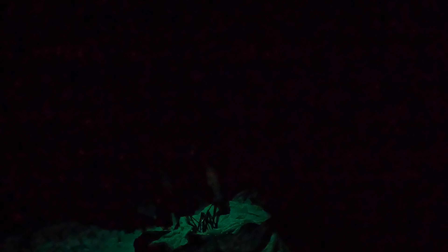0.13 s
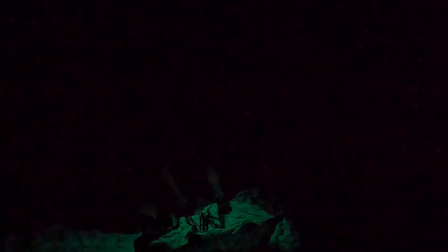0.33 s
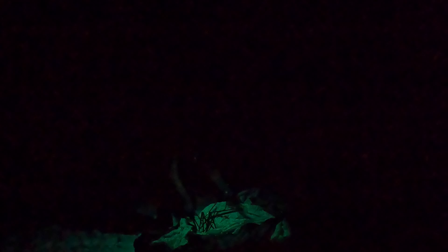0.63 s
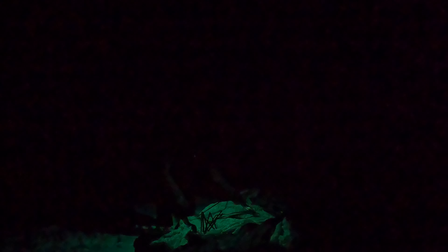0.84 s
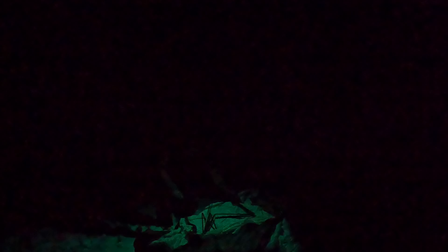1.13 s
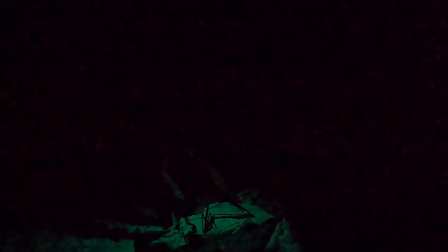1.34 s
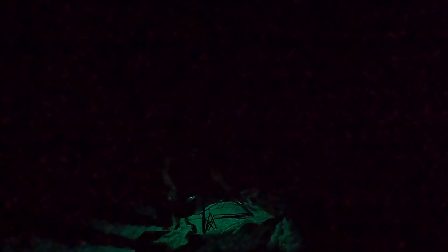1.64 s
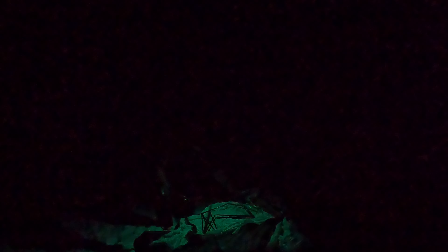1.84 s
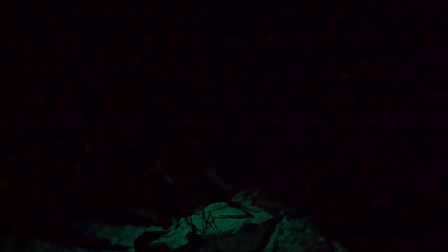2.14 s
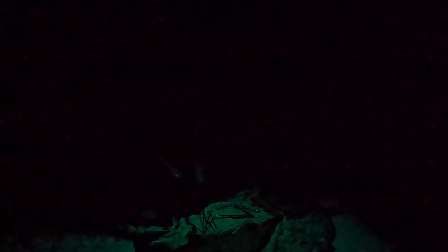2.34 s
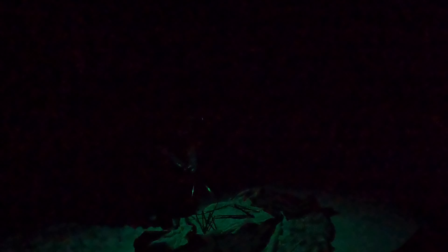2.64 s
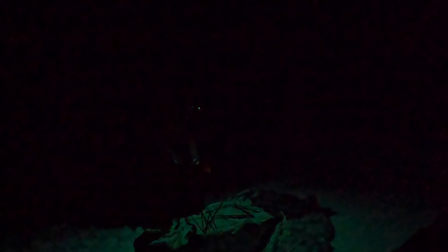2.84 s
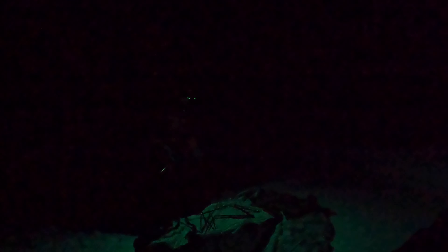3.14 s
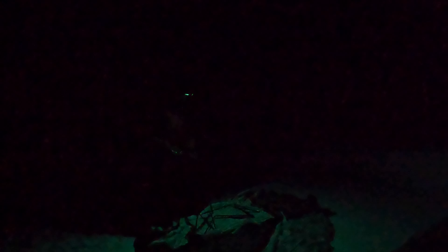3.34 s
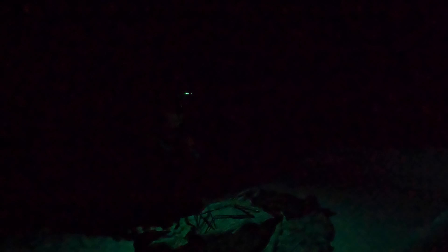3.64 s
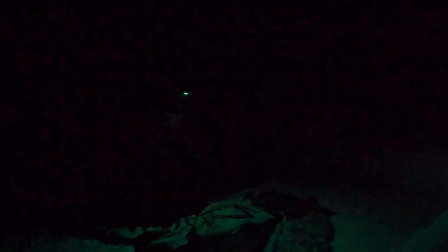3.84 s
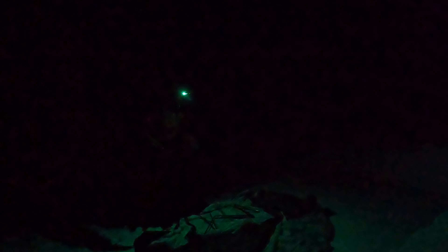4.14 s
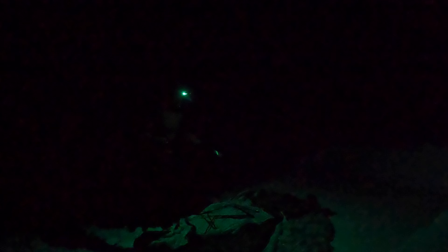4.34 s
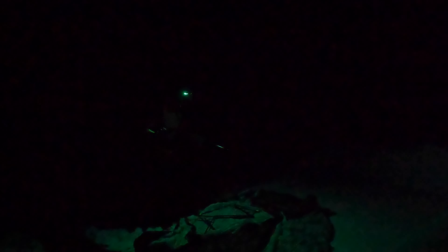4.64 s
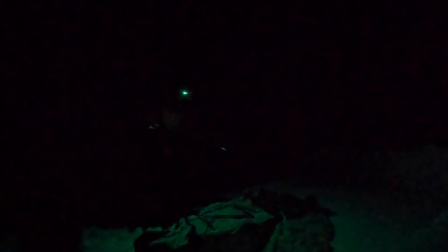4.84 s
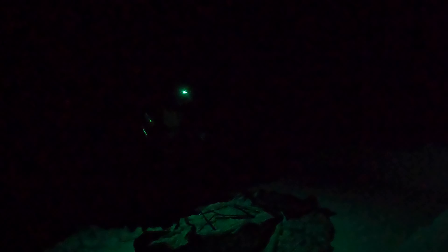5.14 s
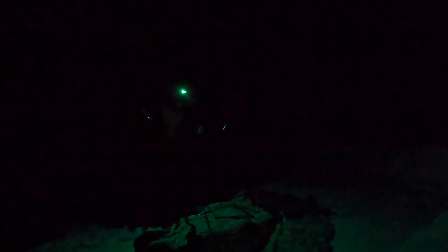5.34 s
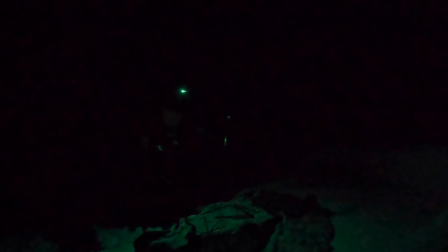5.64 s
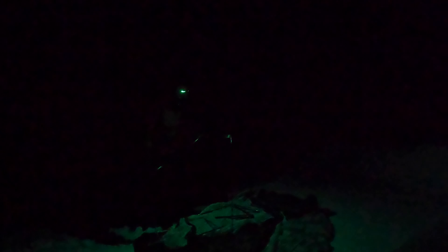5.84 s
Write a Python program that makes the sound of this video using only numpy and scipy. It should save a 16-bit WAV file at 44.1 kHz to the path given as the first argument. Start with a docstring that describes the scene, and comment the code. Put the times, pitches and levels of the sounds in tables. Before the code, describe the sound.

Stiff nylon crackles, rustles and snaps as a tent is unpacked in the dark, poles knocking lightly, wind rumbling on the microphone.

```python
"""Unpacking a tent in the cold wind

Stiff nylon slides, crackles and snaps: coloured friction noise, tiny clicks and ragged noise bursts.
Aluminium pole sections knock as bursts too, and now and then ring freely as decaying bending modes.
Wind buffets the two microphone ports and lays a lumpy rumble of drifting noise and dull pops underneath."""
import sys
import numpy as np
from scipy import signal
from scipy.fft import rfft, irfft
from scipy.io import wavfile
from scipy.ndimage import uniform_filter1d

SR = 44100
rng = np.random.default_rng(int(sys.argv[2]) if len(sys.argv) > 2 else 0)


def output_pcm(signal):
    """Save a mono or channel-first signal as 16-bit PCM at the path in sys.argv[1].

    Samples are clipped to [-1, 1] before scaling.
    """
    pcm = np.clip(np.atleast_2d(signal).T, -1, 1) * 32767
    wavfile.write(sys.argv[1], SR, np.round(pcm).astype(np.int16))


def volts(x):
    """Linear amplitude factor 10**(x/20) for a level x in dB, scalar or array-like."""
    e = np.asarray(x, float) / 20
    return 10 ** e


N = 263673


def rms_one(x):
    """Scale to rms 1."""
    return x / np.sqrt(np.mean(x ** 2) + 1e-20)


def in_time(rows):
    """Columns of a curve table after its times, one value per sample."""
    s, *columns = np.transpose(rows)
    return [np.interp(np.arange(N) / SR, s, column) for column in columns]


def sides(pan_db):
    """Left and right gains for a level difference, positive to the left."""
    return volts(np.array([pan_db / 2, -pan_db / 2]))


def band(x, low_hz, high_hz):
    """Butterworth band-pass."""
    edges_hz = [low_hz, min(high_hz, .45 * SR)]
    return signal.sosfilt(signal.butter(2, edges_hz, "band", fs=SR, output="sos"), x)


def colour(x, spectrum):
    """Give a steady noise its spectrum and rms 1."""
    hz = np.maximum(np.arange(N // 2 + 1) * SR / N, 1)
    point_hz, point_db = np.transpose(spectrum)
    gain_db = np.interp(np.log(hz), np.log(point_hz), point_db, left=-80, right=-80)
    return rms_one(irfft(rfft(x) * volts(gain_db), N))


def drift(corner_hz):
    """Slow chance with spread 1: noise through two equal one-pole low-passes."""
    step = 40   # samples between computed points
    r = np.exp(-2 * np.pi * corner_hz * step / SR)
    white = rng.standard_normal(N // step + 2002)
    slow = signal.lfilter([1], [1, -2 * r, r * r], white)[2000:]    # skip the filter's start
    return np.interp(np.arange(N) / step, np.arange(len(slow)), rms_one(slow))


def pair(alike):
    """Two noises that share a part: 0 unrelated, 1 identical."""
    mid, side = rng.standard_normal((2, N))
    alike = np.clip(alike, 0, 1)
    return np.sqrt(1 + alike) * mid + np.sqrt(1 - alike) * side * [[1], [-1]]


def ring(x, hz, t60_s):
    """Two-pole resonator: a unit click sets a sine of about height 1 ringing."""
    r = volts(-60 / (t60_s * SR))
    w = 2 * np.pi * hz / SR
    return signal.lfilter([0, np.sin(w)], [1, -2 * r * np.cos(w), r * r], x + 1e-18)


def late_left(x, lag_ms=0.5):
    """Eddies drift past the right port first, so the left channel is delayed."""
    n = np.arange(N)
    return np.array([np.interp(n - lag_ms * SR / 1000, n, x[0]), x[1]])


# wind on the ports before buffets and chance swings: start_s, rumble_db, sharpness_db (upper over rumble)
WIND = [(0, -28, -30.5), (.3, -23.5, -15), (.75, -30.5, -19.5), (1.2, -29.5, -20), (1.42, -35, -32.5),
        (1.6, -30, -28.5), (2.1, -27, -21.5), (2.4, -31.5, -20), (2.72, -27.5, -22.5), (2.85, -36, -22),
        (3.12, -41.5, -19), (3.27, -38, -17.5), (3.4, -23, -21), (3.9, -25, -22.5), (4.3, -24, -11),
        (4.75, -26.5, -16.5), (5.05, -24.5, -14.5), (5.45, -25.5, -16.5), (5.65, -18.5, -17.5),
        (5.8, -28.5, -25.5), (5.98, -24, -11)]
# colour of the deep rumble: pitch_hz, density_db (dB per Hz)
WIND_LOW = [(15, 10.5), (30, 1), (60, 0), (100, -6), (150, -17.5), (220, -33.5)]
# colour of the upper rumble: pitch_hz, density_db (dB per Hz)
WIND_HIGH = [(80, -9.5), (150, 4), (220, -2), (320, -15), (500, -29), (800, -38.5)]
# buffets that swell or sink: middle_s, upper_lift_db, length_s (between the 1/e points of the dB curve)
BUFFETS = [(0.172, 16, 0.084), (.37, 7, .05), (.485, 11, 0.054), (0.772, 10, 0.16), (1.147, 13, 0.023),
           (1.727, 12.5, 0.023), (2.009, 11, 0.078), (2.191, 8.5, 0.063), (2.35, 15, 0.028),
           (2.463, 17.5, 0.05), (2.64, 5, 0.087), (3.323, 19.5, 0.13), (3.509, 10, .08), (3.69, 16.5, 0.04),
           (3.853, 18.5, 0.096), (4.127, 12, 0.062), (4.49, -10, 0.031), (4.581, 11.5, .05),
           (4.915, 11, 0.07), (4.976, 11, 0.067), (5.118, 12, 0.072), (5.357, 12, 0.05), (5.545, 16, 0.077),
           (5.681, 10, .07), (5.877, 3.5, 0.047)]


def wind():
    """Eddies push on the ports; the small sharp ones come in lumps and hit the right port harder."""
    rumble_db, sharp_db = in_time(WIND)
    t = np.arange(N) / SR
    lift_db = sum(db * np.exp(-(2 * (t - s) / length) ** 2) for s, db, length in BUFFETS)
    gust_db = 1.5 * drift(8.0)
    veer_db = 1.8 + 2.5 * drift(8.0)    # both rumbles wander about a lean to the left
    low = colour(pair(0.55) * volts(1.67 * drift(25)), WIND_LOW)
    low = low * volts(0.49 * lift_db)     # the deep rumble takes about half of each buffet
    lumps = volts(2.2 * drift(30) + [1.5 * drift(30), 1.5 * drift(30)])   # shared, then per port
    high = late_left(colour(pair(0.74) * lumps, WIND_HIGH))
    high = high * sides(pan_db=-7.0)[:, None]
    high = high * volts(sharp_db + lift_db + 1.5 * drift(9.5))
    rumble = volts(rumble_db + gust_db) * sides(veer_db) * (low + high)
    return rumble + late_left(pops())


def grains(per_s, spread_db, low_hz, high_hz, count=8):
    """Creases let go in clumps of tiny unequal clicks, each dying within a cycle of one of a few pitches."""
    sizes = volts(spread_db * np.minimum(rng.exponential(1, N), 4)) * rng.choice([-1, 1], N)
    chance = per_s * volts(5.0 * drift(25)) / SR      # clumping swings the rate
    clicks = sizes * (rng.random(N) < chance)
    dealt = rng.integers(0, count, N)
    out = np.zeros(N)
    for k, hz in enumerate(np.geomspace(low_hz, high_hz, count)):
        out += rms_one(ring(clicks * (dealt == k), hz, 0.64 / hz)) * np.sqrt(hz)
    return rms_one(out)


# sliding cloth, rms levels ahead of the ports: start_s, swish_db (dull), rasp_db (middle), hiss_db (bright)
SLIDE = [(0, -56, -49.5, -55.5), (.2, -57, -60, -54.5), (.42, -50, -55, -56), (.52, -46.5, -51, -53.5),
         (.62, -59, -60, -63.5), (.75, -58, -47, -51), (.9, -60, -61, -65), (1.03, -63, -52, -52.5),
         (1.15, -71, -72, -70), (1.4, -72, -73.5, -77), (1.85, -72, -74, -72), (1.93, -56, -51.5, -57),
         (2.05, -51, -50, -59), (2.18, -65.5, -69, -72), (2.43, -62.5, -65.5, -63),
         (2.7, -52.5, -55, -54.5), (2.93, -55, -59, -54), (3.1, -62, -63.5, -62), (3.45, -63, -57, -61.5),
         (3.62, -59.5, -58.5, -53), (3.72, -57, -55, -55), (3.87, -64, -52.5, -55.5),
         (4.19, -64.5, -56.5, -56.5), (4.4, -74.5, -72.5, -69.5), (4.55, -56.5, -47, -50),
         (4.62, -61, -51, -53), (4.8, -67, -64.5, -64), (5.05, -73, -71, -67), (5.22, -66, -59, -55.5),
         (5.45, -59.5, -57.5, -61), (5.56, -57.5, -58, -62), (5.75, -71.5, -64, -62.5),
         (5.98, -48, -41.5, -48.5)]
# how far the cloth crumples rather than glides: start_s, crumple (0-1)
CRUMPLE = [(0, .8), (.6, 1), (1.1, .9), (2.1, .9), (2.55, .9), (2.65, .25), (3.5, .3), (3.7, .6),
           (3.85, .15), (4.35, .15), (4.5, .9), (5.98, .9)]
# colour of the dull part: pitch_hz, density_db (dB per Hz)
SWISH = [(350, -4), (650, -6), (900, -10), (1150, 2), (1500, 0), (1900, -5), (2600, -35)]
# colour of the middle part: pitch_hz, density_db (dB per Hz)
RASP = [(1300, -9.5), (2000, -3.5), (2800, 3), (3500, -0.5), (4500, -3.5)]
# colour of the bright part: pitch_hz, density_db (dB per Hz)
HISS = [(2000, -40), (3500, 4), (5000, 8), (7500, 5.5), (9000, 0.5), (12000, -3.5), (14500, -9)]


def cloth():
    """Smooth friction noise with crackle in it, in a dull, a middle and a bright part."""
    swish_db, rasp_db, hiss_db = in_time(SLIDE)
    crumple, = in_time(CRUMPLE)
    flutter = volts(2.8 * crumple * drift(21))
    coarse = crumple * grains(500.0, 4.0, low_hz=600, high_hz=4000)
    fine = crumple * grains(800.0, 3.2, low_hz=2500, high_hz=12000)
    swish = colour(pair(1.0) * flutter + volts(-6) * coarse, SWISH)
    rasp = colour(pair(1.0) * flutter + volts(0.5) * coarse, RASP)
    hiss = colour(pair(1.0) * flutter + volts(-5.0) * fine, HISS)
    return volts(swish_db) * swish + volts(rasp_db) * rasp + volts(hiss_db) * hiss


def ticks(count=120):
    """Small dull ticks by chance, as rows like SNAPS: crowded in strong crumpling swish, louder with it."""
    swish_db = in_time(SLIDE)[0]
    when, size, pitch, length = rng.random((count, 4)).T
    share = np.cumsum(in_time(CRUMPLE)[0] ** 2 * volts(0.65 * swish_db))
    at = np.minimum(np.searchsorted(share / share[-1], when), N - 1)
    peak_db = swish_db[at] + 10 - 4 * np.log(np.maximum(size, .05))
    patch_hz = 1080 * 2 ** (2.0 * pitch ** 2)       # up to two octaves above 1080 Hz
    top_db = np.full(count, -16.5)
    t60_ms = 12 * 6.6 ** (2 * length - 1)
    return np.transpose([at / SR, peak_db, patch_hz, top_db, t60_ms])


# snaps of cloth and knocks of held poles, ahead of echoes and ports:
# start_s, peak_db (nominal), patch_hz (resounding patch), top_db (over the middle part), t60_ms (nominal)
SNAPS = [(.0215, -32.5, 3180, -17, 30), (.0456, -36, 4900, -24, 23), (.0536, -35.5, 4500, -10, 17),
         (.1664, -36.5, 2220, -12, 28), (.1883, -38, 1380, -10, 34), (.2078, -26.5, 4900, -10, 31),
         (.2723, -35.5, 4380, -6, 110), (.2846, -33.5, 3320, -19, 37), (.2927, -30.5, 4140, -12, 98),
         (.307, -31, 4300, -3.5, 28), (.3604, -40, 3070, -27, 5.9), (.3787, -53, 1360, -9, 9),
         (.42, -43, 1140, -14, 15), (.4345, -48, 1190, -20, 19), (.4759, -42, 1180, -17, 18),
         (.483, -38, 1410, -18, 6.4), (.5141, -42, 1210, -18, 7.7), (.5515, -28.5, 1380, -28, 8.7),
         (.597, -46, 1420, -15, 11), (.662, -42, 3540, -25, 27), (.6782, -29, 4780, -19, 13),
         (.7138, -18, 5170, -10, 35), (.7688, -29, 3900, -14, 16), (.782, -26.5, 3540, -6, 59),
         (.8254, -37.5, 1300, -13, 43), (.8871, -34, 5070, -9, 32), (.9576, -30.5, 3600, -14, 62),
         (.9256, -41, 3470, -21, 34), (.9798, -38, 2760, -26, 110), (1.0303, -52, 2950, -16, 63),
         (1.0976, -25, 3700, -2.5, 31), (1.107, -38, 3700, -12, 71), (1.1938, -41.5, 5100, -1, 40),
         (1.2108, -27.5, 3730, -7, 49), (1.221, -27, 5300, -16, 47), (1.2322, -18.5, 4540, -9, 25),
         (1.2446, -32.5, 4970, -11, 118), (1.2989, -24.5, 3500, -11, 23), (1.3067, -33.5, 5070, -12, 75),
         (1.407, -39.5, 2440, -31, 10), (1.4783, -48, 1500, -9, 11), (1.5903, -37.5, 1070, -9, 1.4),
         (1.608, -51, 1220, -11, 10), (1.6308, -39.5, 1300, -11, 4), (1.67, -46.5, 6650, -11, 12),
         (1.7043, -47, 1230, -6, 6.2), (1.7375, -37, 5300, -6, 16), (1.8086, -41, 2820, -14, 41),
         (1.8771, -31, 1340, -11, 8.9), (1.8962, -33, 1910, -10, 25), (1.907, -27.5, 4750, -1, 112),
         (1.9287, -37, 2780, -17, 53), (1.945, -25, 3540, -21, 13), (1.984, -41, 1270, -9.5, 22),
         (2.0194, -43.5, 4240, -2, 22), (2.0428, -42, 1210, -10, 43), (2.1085, -33, 1330, -15, 11),
         (2.122, -30.5, 4180, -9, 23.5), (2.171, -38.5, 1180, -10, 6.9), (2.1927, -41.5, 1960, -26, 12),
         (2.223, -38.5, 1780, -26, 9.2), (2.3371, -40, 1360, 1, 26), (2.3513, -40, 1940, -16, 5.6),
         (2.4003, -38, 990, -22, 8.2), (2.4376, -44, 5600, -2, 30), (2.5204, -33.5, 1720, -12, 7.5),
         (2.5762, -44, 1110, -16, 19), (2.5943, -45, 1700, -8, 22), (2.85, -36.5, 2740, -16, 20),
         (2.9381, -36, 2830, -11, 18), (2.9817, -25, 6600, -6.5, 33), (2.9914, -31.5, 6540, -13, 75),
         (3.0568, -15.5, 10700, -3.5, 28), (3.0813, -30.5, 6600, -4, 56), (3.261, -37.5, 2720, -11, 40),
         (3.2871, -30.5, 1300, -22, 2.8), (3.2955, -25, 4460, -4.5, 67), (3.3356, -40.5, 1690, -17, 25),
         (3.5302, -39.5, 1900, -7, 10), (3.6507, -37, 6010, -10, 30), (3.6906, -39, 1810, -5.5, 21),
         (3.7799, -20, 5800, 2, 38), (3.8132, -26, 5650, -6, 57), (3.8393, -41, 4350, -11, 61),
         (4.125, -24, 2770, -8, 66), (4.3641, -22.5, 5800, -5, 12), (4.3747, -35.5, 5730, -14, 124),
         (4.4201, -23, 7030, -7, 22.4), (4.4291, -30.5, 4750, -8.5, 70), (4.468, -34.5, 1260, -16, 26),
         (4.488, -34.5, 1310, 0, 47), (4.528, -23, 4260, -9, 13), (4.5417, -15, 5320, 2, 35),
         (4.5594, -24.5, 4140, -16, 33), (4.6157, -34.5, 2240, -10, 26), (4.6477, -38.5, 4290, -16, 20),
         (4.6738, -37, 4220, -14, 97), (4.6936, -20, 6470, -4, 46), (4.7167, -50, 3230, 0, 15),
         (4.7413, -16, 3550, -11.5, 24.7), (4.8551, -33, 5330, -7, 16), (4.898, -28, 6340, -10, 25),
         (4.9073, -35, 3640, -15, 180), (4.9447, -24.5, 3210, -14.5, 29), (4.965, -38, 3600, -21, 20),
         (5.0141, -36, 3470, -17, 36), (5.0834, -38.5, 3800, -7.5, 78), (5.1738, -30.5, 6040, -6.5, 27),
         (5.21, -28, 6400, -5, 23), (5.2351, -23.5, 5150, -9, 29), (5.2756, -18.5, 11900, -10, 22),
         (5.2916, -37, 5840, -4, 82), (5.3278, -18.5, 7080, 1, 18), (5.3394, -36, 9350, -2, 24),
         (5.37, -34.5, 6220, -14, 15), (5.4018, -38, 3920, -11, 31), (5.42, -31, 1140, -22, 4.1),
         (5.4415, -36.5, 3790, -2, 140), (5.4808, -17, 4700, -2.5, 27), (5.5227, -13, 2560, -9, 12),
         (5.5421, 0, 9650, 3, 13.6), (5.5676, -25.5, 4110, -21, 17), (5.5858, -28, 3800, -18, 22),
         (5.622, -27.5, 3360, -8, 85), (5.6481, -3, 7430, 5.5, 11), (5.6607, -25.5, 3360, -21.5, 52),
         (5.6742, -16.5, 5700, -2, 28), (5.6827, -21, 3440, -9.5, 65), (5.7091, -16, 5340, -5.5, 33),
         (5.8442, -33, 5000, -12, 160), (5.875, -23, 1000, 0, 6.8), (5.8776, -24, 720, -10.5, 200),
         (5.9248, -23, 2550, -8, 18), (5.9547, -19, 4770, -12, 23), (5.9733, -22.5, 4020, -9, 57)]
# edges of the four parts of a snap, bottom to top: low_hz, high_hz
SNAP_BANDS_HZ = [(500, 1640), (1200, 2610), (2500, 7160), (7500, 11860)]
# low part of a snap by its patch, ahead of the loss in short stiff snaps: patch_hz, low_db (over the middle)
SNAP_LOW = [(750, 4), (1100, 12.5), (2000, 0), (3200, -9), (9000, -6)]


def snaps(size=2560):
    """A ragged burst of cracks that swells and dies; the shaken patch resounds, a faint rattle trails."""
    s, peak_db, patch_hz, top_db, t60_ms = np.vstack([SNAPS, ticks()]).T[:, :, None]
    table_hz, table_db = np.transpose(SNAP_LOW)
    low_db = np.interp(np.log(patch_hz), np.log(table_hz), table_db)
    # above 3 kHz short snaps lose 17.5 dB more per halving under 30 ms
    low_db = low_db + 17.5 * (patch_hz > 3000) * np.minimum(np.log2(t60_ms / 30), 0)

    t_ms = np.arange(size) / SR * 1000
    white, ragged = rng.standard_normal((len(s), 2, size)).transpose(1, 0, 2)
    rise_ms = 0.34 + 0.031 * t60_ms     # long snaps also swell more slowly
    swell = np.minimum(t_ms / rise_ms, 1) ** 1.3
    dying_ms = np.maximum(t_ms - rise_ms, 0)
    decay = volts(-60 * (dying_ms / t60_ms) ** 0.98)
    rattle = volts(-22.5 - 60 * (dying_ms / 70) ** 1.2)   # the faint, longer tail
    push = white * np.abs(ragged) ** 1.49 * swell * (decay + rattle)

    parts = np.array([band(band(push, *edges_hz), *edges_hz) for edges_hz in SNAP_BANDS_HZ])
    bottom, low, middle, top = parts / parts.std(axis=2, keepdims=True)
    depth_db = 0.94 * np.minimum(low_db, 8) - 13    # the duller the snap, the further down it reaches
    broad = volts(low_db) * (low + volts(depth_db) * bottom) + middle + volts(top_db) * top

    patch_t60_s = .009
    overtones = 1.304 + 0.79 * rng.random((len(s), 2))      # two per patch, as pitch ratios
    patch = []
    for x, hz, ratios in zip(push, patch_hz[:, 0], overtones):
        upper = sum(0.08 * ring(x, min(hz * ratio, 13000), patch_t60_s) for ratio in ratios)
        patch.append(rms_one(ring(x, hz, patch_t60_s) + upper))
    snap = broad + volts(-4.0) * broad.std(axis=1, keepdims=True) * patch

    # height of a sine as strong as the loudest 1.5 ms
    height = np.sqrt(2 * uniform_filter1d(snap ** 2, size=66).max(axis=1, keepdims=True))
    out = np.zeros(N + size)
    for at, one in zip(np.round(s[:, 0] * SR).astype(int), volts(peak_db) * snap / height):
        out[at:at + size] += one
    return out[:N]


# single eddies that burst on the ports: start_s, peak_db (ahead of panning), t60_s (held within .01-.2)
POPS = [(0.184, -28, 0.13), (0.48, -28, 0.097), (2.039, -35.5, 0.036), (3.28, -32.5, 0.062),
        (3.329, -34, 0.032), (3.447, -35, 0.092), (3.498, -41, .025), (3.817, -30.5, 0.25),
        (4.062, -44, 0.065), (4.116, -17.5, 0.042), (4.47, -34, .067), (4.945, -25, 0.044),
        (4.982, -21.5, 0.03), (5.093, -38, .05), (5.117, -30, 0.024), (5.14, -20, 0.035),
        (5.518, -24.5, 0.14), (5.88, -32.5, 0.034)]


def pops(size=2048):
    """A short dull puff of pressure, partly different at each port and stronger on the right."""
    out, t = np.zeros((2, N + size)), np.arange(size) / SR
    noises = rng.standard_normal((len(POPS), 2, size))
    for (s, peak_db, t60_s), (mid, side) in zip(POPS, noises):
        shape = np.minimum(t / 0.00043, 1) * volts(-60 * t / np.clip(t60_s, .01, .2))
        burst = (mid + 0.39 * side * [[1], [-1]]) * shape
        puff = band(band(burst, 182, 430), 177.6, 470)
        at = round(s * SR)
        out[:, at:at + size] += volts(peak_db) * sides(pan_db=-6.5)[:, None] * puff / np.abs(puff).max()
    return out[:, :N]


# touches of a loose pole section, ahead of mode levels, echoes and ports:
# start_s, strike_db, favoured_hz (freest mode), slope_db (others weaker, dB per octave)
PINGS = [(4.8234, -39, 3420, 45), (4.8545, -27.5, 3900, 5), (4.912, -50, 3531, 22),
         (5.0529, -50.5, 3531, 33.5), (5.068, -55, 3531, 30), (5.2121, -35, 5152, 2)]
# bending modes of a pole section: pitch_hz, level_db (added to the strike), t60_s
POLE = [(1124, -12, .12), (2175, -6, .09), (3532, -5, .09), (5150, 0, .085), (6995, -1, .09),
        (9120, -11, .09), (11430, -16, .09), (12570, -20, .07)]


def pole():
    """Each touch strikes the bending modes of the tube; where it is held decides which ones sound."""
    s, strike_db, favoured_hz, slope_db = np.transpose(PINGS)
    out = np.zeros(N)
    for hz, level_db, t60_s in POLE:
        held_db = slope_db * np.abs(np.log2(hz / favoured_hz))
        clicks = np.zeros(N)
        clicks[np.round(s * SR).astype(int)] = volts(strike_db + level_db - held_db)
        out += ring(clicks, hz, t60_s)
    return out


# echoes of snaps and poles: delay_s (left; the right is 1.3 times later), level_db
GROUND_ECHOES = [(.0045, -10), (0.01, -21), (0.024, -20)]


def ground(x):
    """A few dull echoes off the ground and the spread cloth, later on the right."""
    dull, out = band(x, 1290, 4500), np.array([x, x])
    for delay_s, level_db in GROUND_ECHOES:
        for side, lag in enumerate([round(delay_s * SR), round(1.3 * delay_s * SR)]):
            out[side, lag:] += volts(level_db) * dull[:-lag]
    return out


# how the left port hears airborne sound against the right: pitch_hz, louder_db, lead_rad
# (half of the level goes to each port; the lead is applied half forward, half back)
PORTS = [(500, -1, -0.36), (1220, -1, 0.4), (2500, -0.5, 0.45), (5500, 0, -0.42), (8500, 1, -0.37),
         (10600, 2.5, -0.44), (12100, 4.5, -1.2), (13200, 6, 1.5)]


def ports(x):
    """The housing shades the two ports differently with pitch, in level and phase."""
    at_hz, louder_db, lead_rad = np.transpose(PORTS)
    hz = np.arange(N // 2 + 1) * SR / N
    half = volts(np.interp(hz, at_hz, louder_db) / 2) * np.exp(.5j * np.interp(hz, at_hz, lead_rad))
    return irfft(rfft(x) * [half, 1 / half], N)


def scene():
    """Cloth and poles a few steps away, wind at the microphone."""
    struck = ground(snaps() + pole())
    return ports(struck + cloth()) + wind()


def band_limit(x):
    """A steep low-pass at the top of the band."""
    return signal.sosfilt(signal.butter(12, 15180, fs=SR, output="sos"), x)


def record(dry):
    """Microphone self-noise, a treble roll-off and hard overload at full scale."""
    hiss = volts(-66) * band(rng.standard_normal(dry.shape), 740, 9600)
    x = signal.sosfilt(signal.butter(8, 13800, fs=SR, output="sos"), dry + hiss)
    return band_limit(np.clip(x, -1, 1))


dry = scene()
out = record(dry)
output_pcm(out)
```